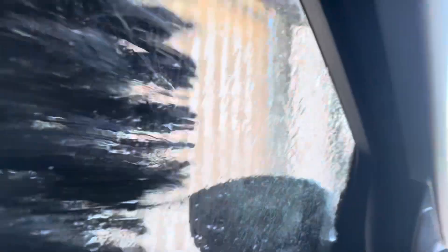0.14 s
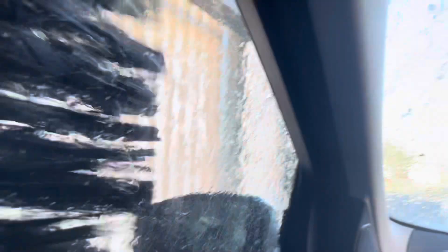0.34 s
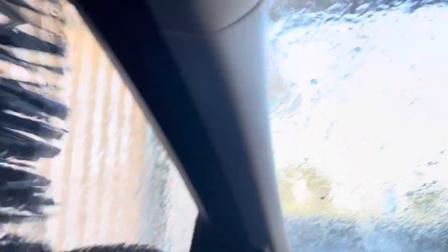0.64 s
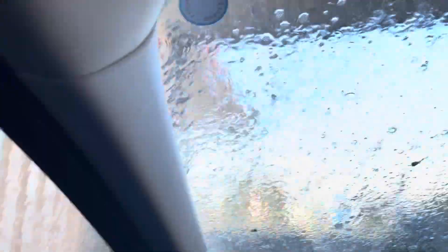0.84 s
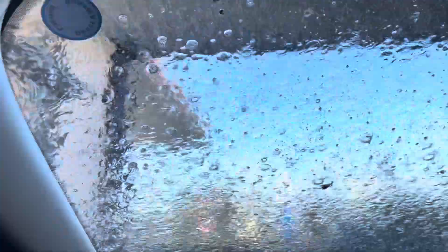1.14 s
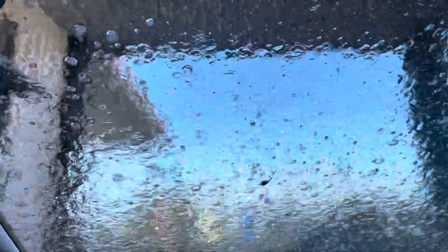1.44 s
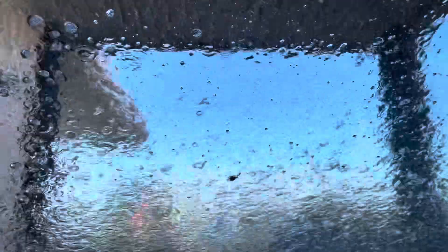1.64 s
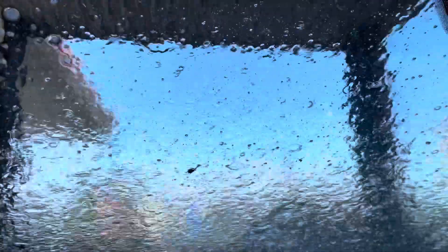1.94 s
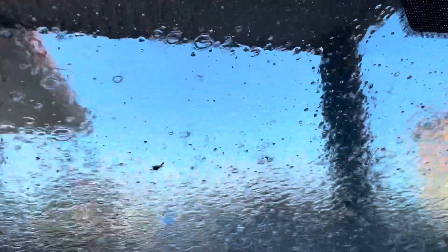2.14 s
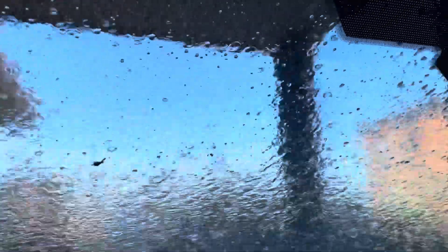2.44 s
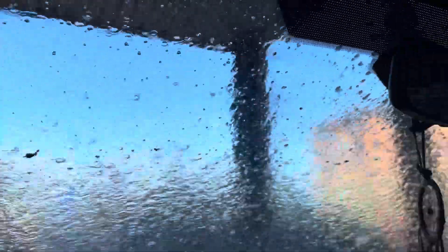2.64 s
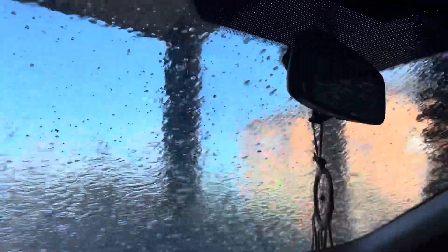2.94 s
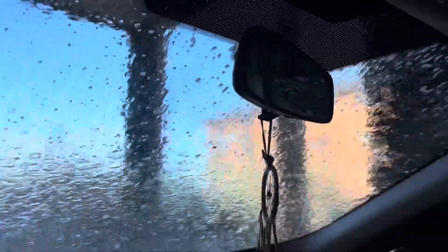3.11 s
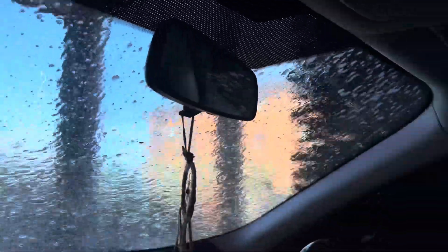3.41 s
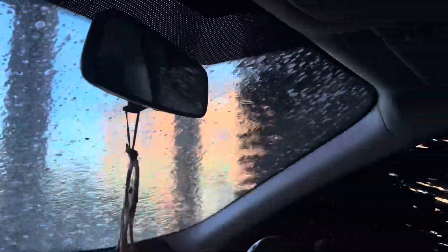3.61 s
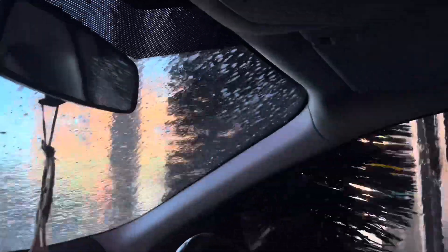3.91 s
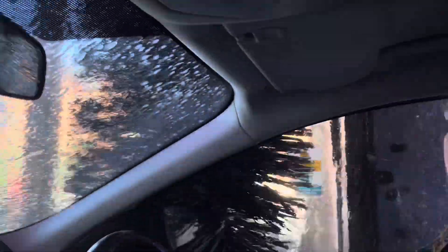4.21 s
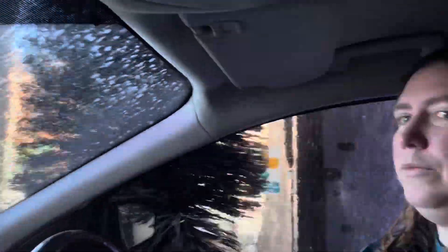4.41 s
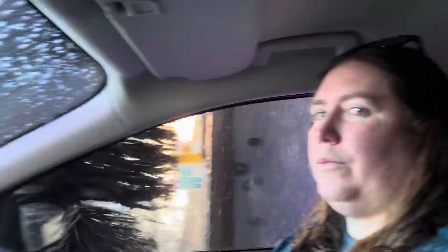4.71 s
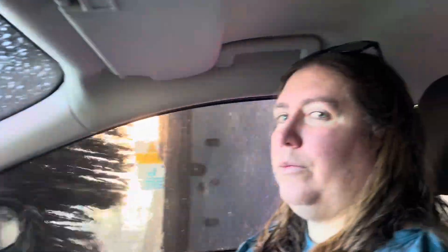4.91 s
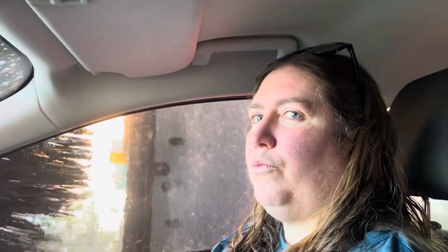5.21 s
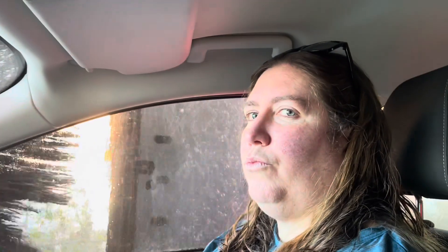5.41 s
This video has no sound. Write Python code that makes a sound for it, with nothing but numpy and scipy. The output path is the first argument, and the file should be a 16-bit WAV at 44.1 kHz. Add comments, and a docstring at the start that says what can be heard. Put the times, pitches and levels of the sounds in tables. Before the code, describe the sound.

Inside a car in an automatic wash, spinning brushes drum on the body while muffled spray and bristles rush loudly and steadily.

```python
"""Inside a car in an automatic wash: spinning brushes drum on both doors while water sprays the glass.
Dense random impacts, coloured by resonances, make the drumming and, muffled by the shell, the rush of
bristles and spray. Damped sines thump, noise bursts slap and noise puffs splash on top. A hand-held phone
turns from the left window towards the right, while resonances and brief whines swell and fade."""
import sys
import numpy as np
from scipy import signal
from scipy.io import wavfile
from scipy.ndimage import uniform_filter1d

SR = 44100
rng = np.random.default_rng(int(sys.argv[2]) if len(sys.argv) > 2 else 0)


def gain_from_decibels(decibels):
    """Convert decibel values to linear amplitude factors."""
    exponent = np.asarray(decibels, float) / 20
    return 10 ** exponent


def materialize(psi):
    """Save the field psi as 16-bit PCM at rate SR to the path in sys.argv[1].

    A 1-D psi becomes a single channel; in a 2-D psi each row is a channel.
    """
    bounded = np.clip(np.atleast_2d(psi).T, -1, 1)
    quanta = np.round(bounded * 32767).astype(np.int16)
    wavfile.write(sys.argv[1], SR, quanta)


N = 245107  # length in samples
FRAME = 2048  # short-time spectrum, in samples
HOP = FRAME // 4


def read(points, hz):
    """Reads a spectrum table on a log-frequency axis."""
    f, value = np.transpose(points)
    return np.interp(np.log(hz + 1), np.log(f + 1), value)


def evened(x):
    """Scales to rms 1."""
    return x / np.sqrt(np.mean(abs(x) ** 2, keepdims=True) + 1e-20)


def peak(hz, centre_hz, width_hz):
    """Power response of a resonance passed twice; the width spans its -6 dB points."""
    return 1 / (1 + (2 * (hz - centre_hz) / np.maximum(width_hz, 5)) ** 2) ** 2


def modes(hz, table):
    """Power response of a set of resonances."""
    return sum(gain_from_decibels(db) ** 2 * peak(hz, f, width) for f, width, db in table)


def layer(shape, db):
    """A power spectrum scaled so that its total follows a level curve."""
    return shape / shape.sum(0) * gain_from_decibels(db) ** 2


def field(shape, bins, frames):
    """Chance that is smooth over some bins and frames, rms 1."""
    rough = rng.standard_normal(shape)
    over_bins = uniform_filter1d(rough, size=bins, axis=0)
    return evened(uniform_filter1d(over_bins, size=frames, axis=1))


def slaps(per_s, spread_db, throb_db, throb_s):
    """Two streams of dense small impacts of uneven size that come in clumps, rms 1 overall."""
    chance, sign = rng.random((2, 2, N))
    size = gain_from_decibels(spread_db * np.minimum(rng.exponential(1, (2, N)), 4))
    clumps = evened(uniform_filter1d(rng.standard_normal(N), max(int(throb_s * SR), 1)))
    hits = (chance < per_s / SR) * np.sign(sign - 0.5)
    return evened(hits * size * gain_from_decibels(throb_db * clumps))


# the phone in the cabin: (t/s, turned from left to right 0-1, nearness to a side window 0-1)
PHONE_PATH = [(0, 0, 1), (.2, 0, 0.62), (.5, 0, 0.47), (1, 0.25, 0.2), (1.8, 0.04, 0.06), (2.3, 0.22, 0.35),
              (2.65, 0.3, 0.4), (2.9, 0.66, 0), (3.3, 0.22, 0.2), (3.8, 0.54, 0.07), (4.3, 0.61, 0.63),
              (4.8, 0.8, 1), (5.1, 0.87, 0.83), (5.55, 0.89, 0.83)]


def phone(t):
    """How far the phone has turned, and how near it is to a side window."""
    s, turned, near = np.transpose(PHONE_PATH)
    return np.interp(t, s, turned), np.interp(t, s, near)


# how the brushes bear on the car, before each part takes its share:
# (t/s, swell of the roar level/dB, extra brightness of the swish level/dB)
BRUSH_PRESSURE = [(0, 0, 0.5), (.2, -0.5, -0.5), (.38, 2.5, -1), (.57, 2.5, -2), (.83, -1, 0),
                  (1.03, 2.5, 0.5), (1.4, 1.5, 0.5), (1.751, -1, -1.6), (2.3, -0.85, -0.2),
                  (2.68, -1.1, -0.5), (2.999, -4.5, -1), (3.2, -0.5, 2.5), (3.42, 2.5, -4), (3.75, 1, -0.5),
                  (4, -2, -1.5), (4.22, 0.5, 0.5), (4.8, -1, 1.7), (5.05, -0.5, 1.5), (5.2, -0.1, 1.7),
                  (5.55, -1, 2.5)]
# each part of the wash: (base level/dB, share of the swell, share of the brightness,
# level/dB gained by a full turn, level/dB gained right at a side window)
PART_LEVELS = {"rumble": (-23.5, -0.56, 0.7, -21, 0.9), "boom": (-25.5, 0.14, 0.04, 0.5, 2.1),
               "door": (-34.5, -0.35, 0.5, 1.5, 8.5), "screen": (-31.5, 1, 0.06, 3, 1.75),
               "roar": (-31, 1.11, -0.52, 2, 1), "scrub": (-37.5, 1, 0.8, 1.4, -1.26),
               "spray": (-47, 0.7, 0.23, 2.1, -1.4), "mist": (-68, 0.2, -0.3, 1, 6)}


def level_db(part, t):
    """A part follows the brushes, the turn of the phone and its nearness to the glass."""
    base_db, swell_share, bright_share, turn_db, near_db = PART_LEVELS[part]
    s, swell_db, bright_db = np.transpose(BRUSH_PRESSURE)
    turned, near = phone(t)
    brushes_db = swell_share * np.interp(t, s, swell_db) + bright_share * np.interp(t, s, bright_db)
    return base_db + brushes_db + turn_db * turned ** 2 + near_db * near


def lean(rule, t):
    """The image tips over as the phone turns."""
    before_db, after_db, bend = rule
    return before_db + (after_db - before_db) * phone(t)[0] ** bend


# left-right lean of lows and panels: (level/dB unturned, level/dB fully turned, bend of the change)
BASS_TILT = (4, -2.6, 2.8)
PANEL_TILT = (5.1, -3.5, 0.36)


def body_lean(hz, t):
    """The bass and the panels above it each tip in their own way."""
    return np.where(hz < 185, lean(BASS_TILT, t), lean(PANEL_TILT, t))


# left-right lean of the wash: (level/dB unturned, level/dB fully turned, bend of the change)
WASH_TILT = (.6, .9, 1.1)


def wash_lean(t):
    """The wash tips with the turn of the phone too."""
    return lean(WASH_TILT, t)


# left port over right port: (f/Hz, level/dB)
LEFT_PORT_TREBLE = [(2500, 0), (4500, 4), (7000, 4), (9000, -0.5)]


def port_lean(hz):
    """Most of the treble favours the left port."""
    return read(LEFT_PORT_TREBLE, hz)


# resonances and brief brightenings or whines of the wash, some of them dips:
# (f/Hz, width/Hz, level/dB, strongest at t/s, lasts t/s)
SWELLS = [(60.7, 19, 2.5, 1.7, 0.91), (72, 55, 1.5, 1.7, 0.3), (94, 29, 4.5, 0.6, 1.1),
          (155, 44, 2, 0.5, 1.1), (145, 31, 7, 2.09, 0.25), (138, 56, -11.5, 3.135, 0.2),
          (138, 81, -7.5, 4.26, 0.8), (136, 100, 3.5, 5, 0.87), (110, 22, 2, 0.53, .5),
          (158, 40, -1, 0.2, .35), (219, 81, -2.5, 3, 0.36), (520, 94, 4.5, 0.27, 0.54),
          (285, 45, 4, 4.42, 0.54), (261, 120, 10, 3.57, 0.47), (420, 50, 6, 3.72, 0.56),
          (322, 126, 4.5, 2.16, 1.5), (355, 31, 13.5, 3.49, 0.28), (432, 124, 5, 5.4, 2),
          (500, 310, 4.5, 4.36, 2.9), (592, 60, -11, 4.65, 0.84), (635, 300, 3.5, 0.66, 0.58),
          (637, 56, 9, 4.23, 1.8), (825.7, 31, 13.5, 1.63, 1.8), (850, 170, 4.5, 0.25, 0.92),
          (930, 110, 4, 2.6, 0.86), (1087, 190, 6, 3.5, 1.3), (1650, 370, 7, 2.34, 0.99),
          (1696, 220, 5.5, 3.5, 0.64), (1910, 250, 5, 1.8, 2.1), (1940, 80, 7, 1.04, 0.11),
          (1980, 62, 3, 1.24, 0.08), (1960, 72, 5, 1.3, 0.11), (1616, 110, 4, 1.05, 0.09),
          (1720, 500, 1, 1.07, 0.22), (2300, 1000, 2, 3.37, 0.12), (2520, 760, 0.5, 3, 0.063),
          (160, 26, -2, 5.4, .2), (1950, 130, 3, 3.7, 1.7), (2136, 130, 6.5, 4.3, 1.5),
          (2300, 160, 6, 3.2, 1.7), (2560, 460, 4.5, 2.73, 0.86), (2720, 610, -1, 1.4, 0.97),
          (2390, 460, 2, 1.7, 1.5)]


def passing(hz, t):
    """Power gain of resonances and brief brightenings or whines that swell and fade."""
    gain_db = sum(db * peak(hz, f, width) * np.exp(-(2 * (t - at) / lasts) ** 2 / 2)
                  for f, width, db, at, lasts in SWELLS)
    return gain_from_decibels(gain_db) ** 2


# side over mid; around 8-9.5 kHz the mid is nearly empty: (f/Hz, level/dB)
SIDE_OVER_MID = [(50, -18), (130, -9), (250, -5.5), (450, 0.5), (800, 0.5), (1600, 1.5), (2600, -2.5),
                 (5000, -1), (7200, 0.5), (8200, 12), (9300, 11.5), (10500, 2.5), (12000, -4), (13500, -17)]
# part of side a quarter cycle off mid, from the spacing of the ports: (f/Hz, share)
PORT_SPACING = [(60, -.1), (200, -0.13), (400, -0.37), (550, -.1), (750, -.3), (1300, -.1), (1800, -.25),
                (3200, .3), (5800, -.1), (7800, -.15), (10500, .3)]


def pair(drive, power, lean_db):
    """Colours two streams into mid and side; side shares part of mid, which tips the image."""
    hz, t, (a, b) = signal.stft(drive, SR, nperseg=FRAME, noverlap=FRAME - HOP)
    wide = gain_from_decibels(read(SIDE_OVER_MID, hz))[:, None]
    # in-phase share that gives this left-right difference
    tip = np.tanh(lean_db(hz[:, None], t) * np.log(10) / 20) * (1 + wide ** 2) / (2 * wide)
    # cabin echoes tie the ports by a random share that wanders over frequency and time
    echoes = 0.46 * field(a.shape, bins=6, frames=80)
    shared = tip + 1j * (read(PORT_SPACING, hz)[:, None] + echoes)
    shared = shared / np.maximum(abs(shared) / np.sqrt(0.95), 1)
    gain = np.sqrt(power(hz[:, None], t) * len(hz))
    mid = gain * a
    side = gain * wide * (shared * a + np.sqrt(1 - abs(shared) ** 2) * b)
    left_right = np.array([mid + side, mid - side])
    return signal.istft(left_right, SR, nperseg=FRAME, noverlap=FRAME - HOP)[1][:, :N]


# resonances of shell, doors and windscreen: (f/Hz, width/Hz, level/dB within the set)
RUMBLE_MODES = [(48, 16, -18), (61.5, 35, -5), (96.3, 23.4, -4.5)]
DOOR_MODES = [(233, 59, -4), (180, 22.6, -2)]
SCREEN_MODES = [(306.3, 24.8, 3), (361, 30, 0.5), (397, 90, -4.5)]
# the drifting boom of the cabin: (t/s, f/Hz, width/Hz)
BOOM_PATH = [(0, 143, 40), (.7, 136, 71), (1.4, 144, 40), (2.2, 145, 27.8), (2.8, 136, 45), (4.2, 131, 40),
             (4.9, 143, 26), (5.55, 134, 24)]
# the brush runs out of round: once a turn the shell rumbles harder while the boom eases
BRUSH_TURN_S, HEAVY_AT_S, RUMBLE_SWING_DB, BOOM_SWING_DB = 0.5, 1.495, 2, -0.9


def drumming():
    """Bristle strips beat the doors and drive the low resonances of shell and cabin."""
    boom_s, boom_hz, boom_width = np.transpose(BOOM_PATH)

    def power(hz, t):
        heavy = np.cos(2 * np.pi * (t - HEAVY_AT_S) / BRUSH_TURN_S)
        boom_shape = peak(hz, np.interp(t, boom_s, boom_hz), np.interp(t, boom_s, boom_width))
        rumble = layer(modes(hz, RUMBLE_MODES), level_db("rumble", t) + RUMBLE_SWING_DB * heavy)
        boom = layer(boom_shape, level_db("boom", t) + BOOM_SWING_DB * heavy)
        door = layer(modes(hz, DOOR_MODES), level_db("door", t))
        screen = layer(modes(hz, SCREEN_MODES), level_db("screen", t))
        return passing(hz, t) * (rumble + boom + door + screen)

    beats = slaps(per_s=3000, spread_db=2.0, throb_db=0.02, throb_s=0.025)
    return pair(beats, power, body_lean)


# tone of the muffled wash in the mid, nearly empty around 8-9.5 kHz,
# before each part gets its own level: (f/Hz, level/dB per Hz)
WASH_TONE = [(300, -12.5), (480, -7), (1000, -10.5), (2000, -19), (3000, -25.5), (5000, -37), (7200, -46),
             (8200, -57), (9300, -59), (10500, -52), (14500, -54), (15300, -73.5)]
GAP_HZ, GAP_WIDTH_HZ, GAP_DB = 5640, 240, -8  # a fixed narrow gap in the hiss


def rushing():
    """Scrubbing bristles and spray, muffled by the shell; low to high, each part has its own level."""
    def power(hz, t):
        gap_db = GAP_DB * peak(hz, GAP_HZ, GAP_WIDTH_HZ)
        tone = gain_from_decibels(read(WASH_TONE, hz) + gap_db) ** 2
        treble, hiss, air = [1 / (1 + (edge_hz / (hz + 1)) ** 8) for edge_hz in (1300, 3000, 8000)]
        bands = {"roar": 1 - treble, "scrub": treble - hiss, "spray": hiss - air, "mist": air}
        total = passing(hz, t) * sum(layer(tone * band, level_db(name, t))
                                     for name, band in bands.items())
        # wet patches of glass brighten and dull at random
        patches_db = 1.2 * field(total.shape, bins=6, frames=6)
        # sheets of spray flicker across the treble
        sheets_db = (0.82 * treble + 1.2 * air) * field(total.shape, bins=300, frames=4)
        # fine random grain in the treble, narrow in frequency
        grain_db = 1.7 * treble * field(total.shape, bins=2, frames=8)
        return total * gain_from_decibels(patches_db + sheets_db + grain_db) ** 2

    def lean_db(hz, t):
        return wash_lean(t) / (1 + (hz / 3000) ** 4) + port_lean(hz)

    swish = slaps(per_s=12000, spread_db=1.62, throb_db=0.71, throb_s=0.019)
    return pair(swish, power, lean_db)


# bundles of strips that thump a panel: (t/s, peak level/dB before the lean, panel f/Hz)
PANEL_THUDS = [(0.014, -21, 122), (0.157, -11.5, 158), (0.281, -18, 147.5), (0.345, -14.5, 120.2),
               (0.473, -24, 86), (0.564, -18, 112), (0.631, -18, 128), (0.673, -25, 130),
               (0.751, -18.5, 160), (1.041, -25, 336), (1.19, -23, 82), (1.21, -18, 155),
               (1.334, -17, 75.2), (1.445, -16, 72), (1.511, -18, 73), (1.599, -21.5, 70),
               (1.452, -21, 147), (1.718, -23, 150), (1.825, -22, 77.3), (1.949, -18, 148.6),
               (2.077, -25, 146), (2.239, -13.5, 140), (2.284, -25, 69.6), (2.504, -20, 76.3),
               (2.616, -21, 146), (2.641, -22.5, 68.6), (3.35, -16.5, 360), (3.465, -20, 368),
               (3.509, -16, 290), (3.535, -9, 357), (3.555, -12, 367), (3.575, -17, 371),
               (3.709, -14.5, 277), (3.936, -17.5, 320), (4.646, -15, 217), (4.72, -18.5, 216),
               (4.801, -15, 229), (4.969, -14, 138), (5.03, -15, 139.2), (5.13, -13.5, 138),
               (5.256, -10, 139), (5.345, -12, 137), (5.425, -10.5, 130), (5.49, -32, 130)]
THUD_RISE_CYCLES, THUD_T60_CYCLES = 1.66, 30.6  # each panel swells and dies over its own cycles


def thuds():
    """Each thump sets one panel ringing briefly, louder on the side the image leans to."""
    t, out = np.arange(20000) / SR, np.zeros((2, N + 20000))
    for s, db, panel_hz in PANEL_THUDS:
        cycles = panel_hz * t
        swell = 1 - np.exp(-(cycles / THUD_RISE_CYCLES) ** 2)
        ring = gain_from_decibels(-60 * cycles / THUD_T60_CYCLES) * swell
        sides = gain_from_decibels(db + body_lean(panel_hz, s) * np.array([[0.5], [-0.5]]))
        tone = np.sin(2 * np.pi * (cycles + rng.random()))
        out[:, round(s * SR):][:, :len(t)] += sides * ring / ring.max() * tone
    return out[:, :N]


# single bristle strips that slap the glass harder than the rest:
# (t/s, level/dB before onset and decay shape it)
HARD_STROKES = [(0.036, -26.5), (0.267, -25), (0.361, -27), (0.455, -26), (0.735, -31.5), (0.907, -36.5),
                (1.026, -24), (1.1, -35), (1.206, -26), (1.606, -31), (2.159, -28.5), (2.741, -32),
                (3.218, -31), (3.255, -24.5), (3.476, -27), (3.818, -36), (4.158, -36), (4.235, -29.5),
                (4.328, -29), (4.49, -28), (4.618, -27.5), (4.686, -26), (4.807, -26.5), (4.873, -28),
                (4.95, -26), (5.135, -28), (5.262, -20.5), (5.352, -26), (5.442, -22.5)]
# the glass under a stroke: (f/Hz, width/Hz, level/dB within the set)
STROKE_COLOUR = [(930, 680, 3.5), (2090, 880, -6.5), (4200, 2500, -26)]
STROKE_LANDS_S, STROKE_DRAG_T60_S = 0.0027, 0.09  # a wet strip lands, then drags


def strokes():
    """Each hard slap is a short wet burst of noise through the glass."""
    t, shape = np.arange(8000) / SR, np.zeros(N + 8000)
    landing = 1 - np.exp(-t / STROKE_LANDS_S)
    for s, db in HARD_STROKES:
        shape[round(s * SR):][:len(t)] += gain_from_decibels(db - 60 * t / STROKE_DRAG_T60_S) * landing
    bursts = shape[:N] * rng.standard_normal((2, N))
    return pair(bursts, lambda hz, t: layer(modes(hz, STROKE_COLOUR), 0 * t),
                lambda hz, t: wash_lean(t) + 0 * hz)


# fat drops splashing on the glass, before the puff shapes them: (t/s, body level/dB, fizz level/dB)
DROPS = [(0.197, -40, -53), (0.47, -48, -54.5), (0.864, -38.5, -57), (1.247, -40, -67), (1.380, -49, -66),
         (1.596, -49, -67), (1.979, -53, -64.5), (2.298, -52, -64), (2.608, -42, -66), (2.889, -47, -49),
         (3.236, -55, -69), (3.526, -36, -53.5), (3.749, -46, -67), (3.8794, -47, -52),
         (4.0894, -40.5, -51), (4.5194, -42.5, -59), (4.625, -48, -61.5), (4.7394, -38.5, -64),
         (4.991, -40, -70), (5.133, -38, -65), (5.254, -41, -55.5), (5.352, -43.5, -67)]
# colour of the body and of the fizz: (f/Hz, width/Hz, level/dB within the set)
DROP_BODY = [(4730, 1100, 1), (6700, 1800, -7.5)]
DROP_FIZZ = [(11500, 2500, 3), (14000, 2000, -9.5)]


def splashes():
    """Each drop bursts into a short puff of noise: a body and a finer fizz."""
    t, out = np.arange(2000) / SR, 0
    puff = gain_from_decibels(-60 * t / 0.038) * (1 - np.exp(-t / 0.0025))
    for column, table in enumerate((DROP_BODY, DROP_FIZZ), start=1):
        shape = np.zeros(N + len(t))
        for row in DROPS:
            shape[round(row[0] * SR):][:len(t)] += gain_from_decibels(row[column]) * puff
        bursts = shape[:N] * rng.standard_normal((2, N))
        out = out + pair(bursts, lambda hz, t: layer(modes(hz, table), 0 * t),
                         lambda hz, t: port_lean(hz))
    return out


def scene():
    """All sources at the phone."""
    return drumming() + rushing() + thuds() + strokes() + splashes()


def low_pass(x):
    """Removes everything above the highest recorded frequency."""
    return signal.sosfilt(signal.butter(12, 15650, fs=SR, output="sos"), x)


def record(dry):
    """The microphone cuts the deepest bass and gain control evens out the throbs."""
    x = signal.sosfilt(signal.butter(4, 44, "high", fs=SR, output="sos"), dry)
    power = abs(uniform_filter1d((x ** 2).mean(0), round(0.054 * SR)))
    loudness_db = 10 * np.log10(power + 1e-9)
    # takes back a fifth of each departure from -17.5 dB
    x = x * gain_from_decibels(-0.2 * uniform_filter1d(loudness_db + 17.5, round(0.013 * SR)))
    return low_pass(x)


dry = scene()
out = record(dry)
materialize(out)
```